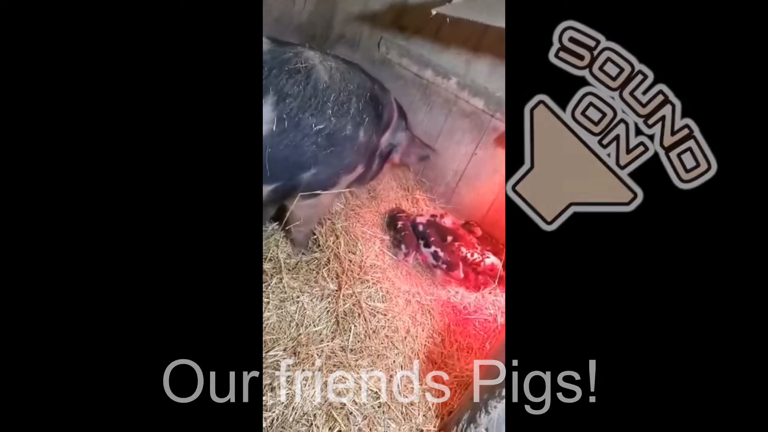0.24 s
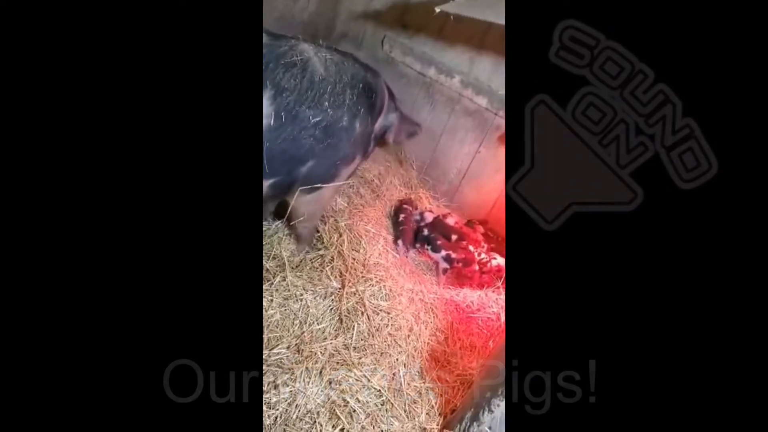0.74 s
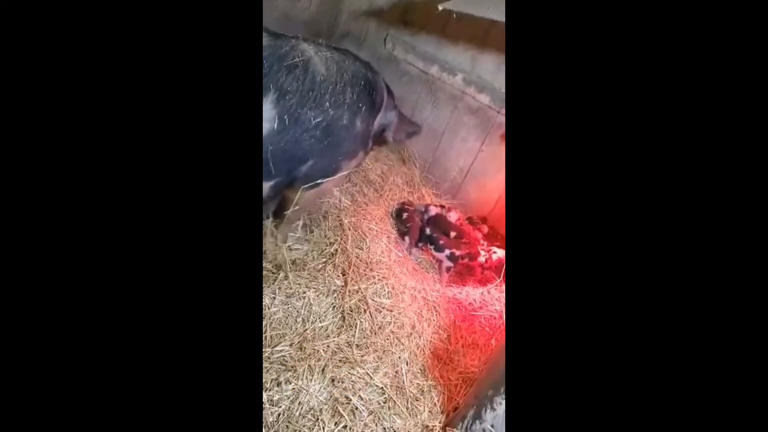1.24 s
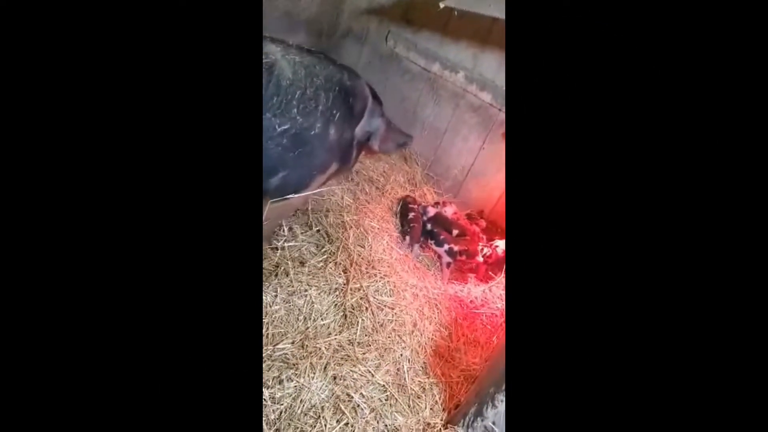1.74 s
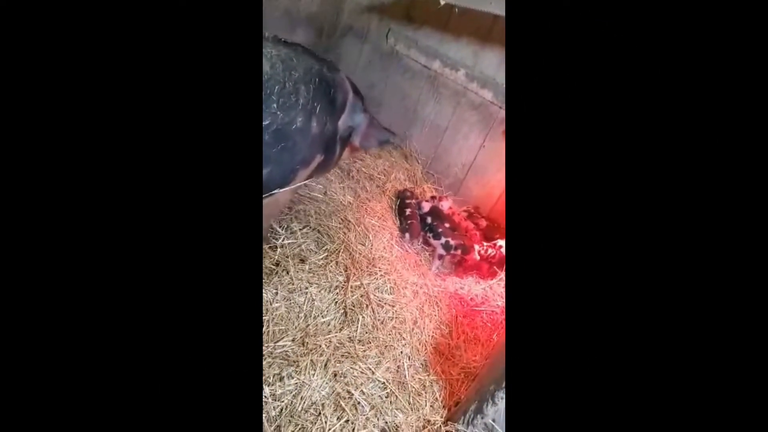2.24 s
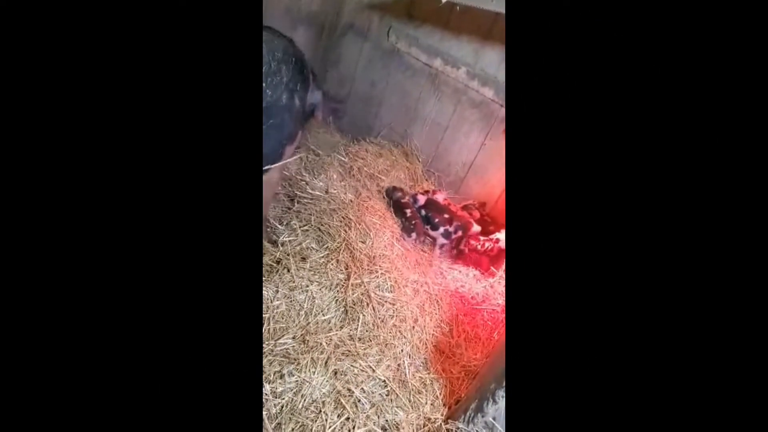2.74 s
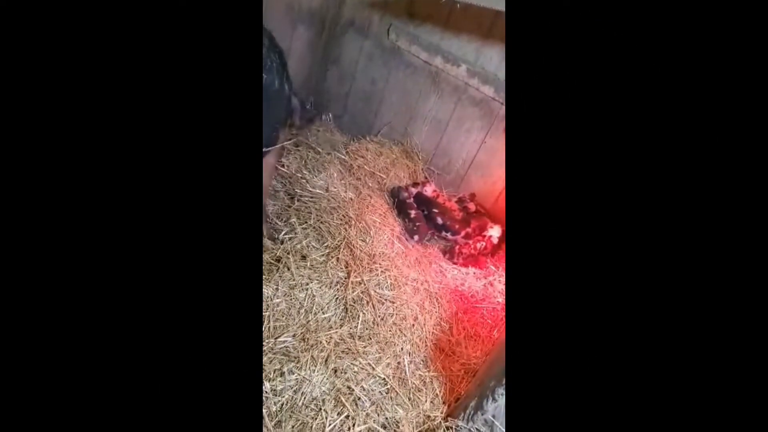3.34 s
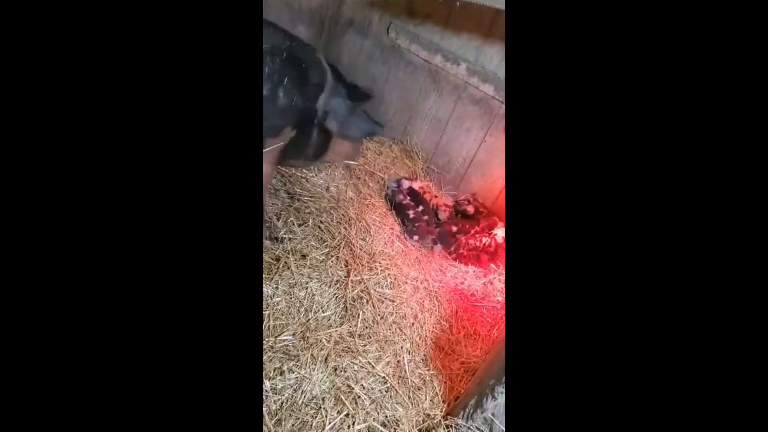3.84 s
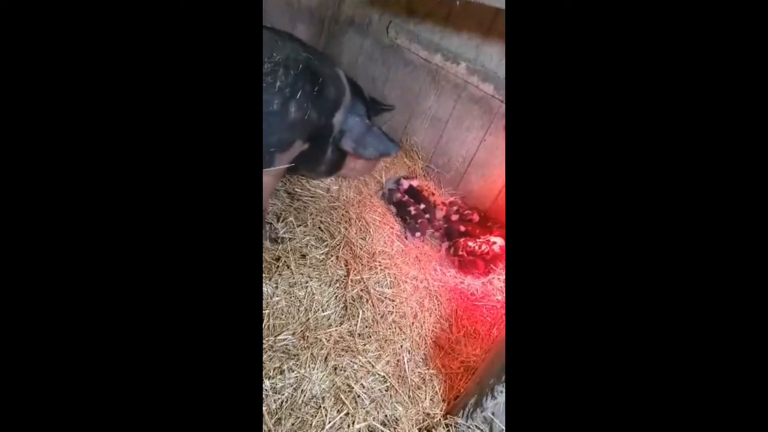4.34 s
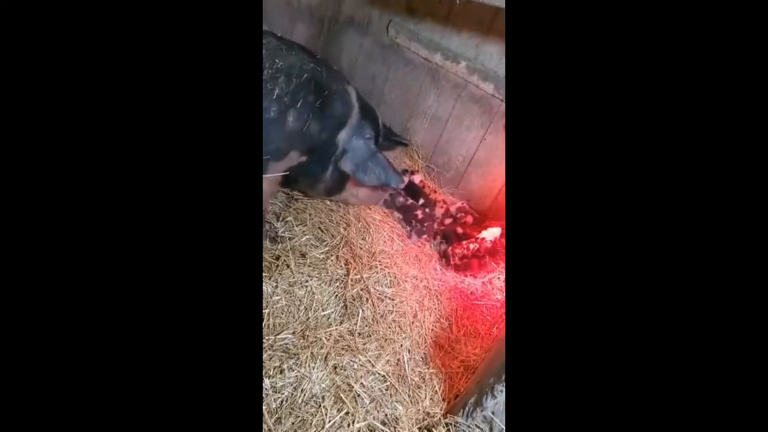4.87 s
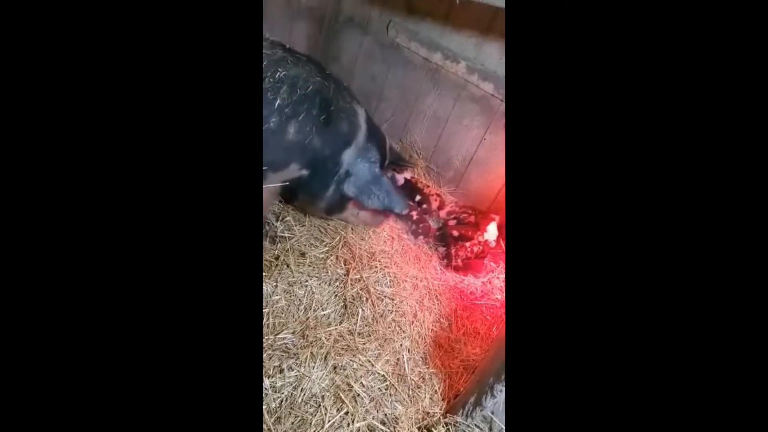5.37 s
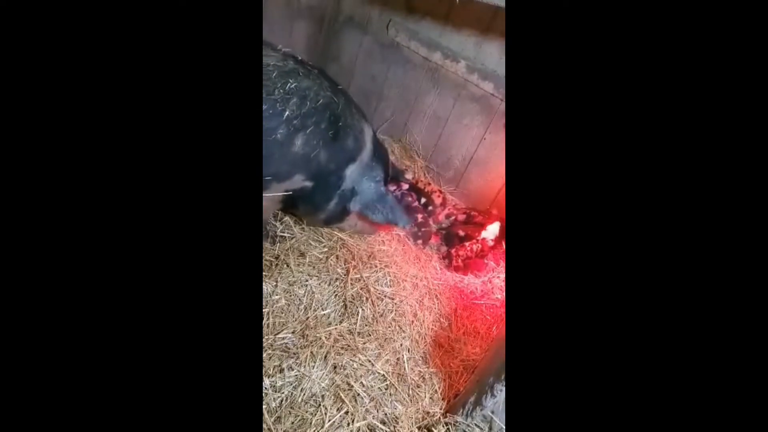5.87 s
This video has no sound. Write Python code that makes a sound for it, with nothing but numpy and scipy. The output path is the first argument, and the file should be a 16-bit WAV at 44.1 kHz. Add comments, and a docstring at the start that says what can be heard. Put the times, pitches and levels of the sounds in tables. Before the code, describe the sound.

A large sow roots right beside the microphone in a straw-bedded wooden pen. Short, deep, croaky grunts come several times a second, mixed with breathy sniffs and rough snorts, some whistling faintly. A deep bass flutter throbs underneath. Just past the middle, a piglet gives one very short, hoarse squeal. Then the grunting and snuffling carry on to the end, over low barn rumble.

```python
"""A sow roots and grunts in a straw-bedded wooden pen, close to a phone with two microphone ports.
Her grunts are a few slow throat pops ringing in chest, nose and mouth; shaped noise, roughened by random
fine clicks, makes her sniffs and snorts, and short tones whistle, hum and thump among them.
A deep flutter of low sines and rumble throbs under her breaths; a piglet squeals once in hoarse partials.
Low coloured noise is the barn; a high band of noise is partly steady and partly follows the breath level."""
import sys
import numpy as np
from scipy import signal
from scipy.fft import rfft, irfft, next_fast_len
from scipy.io import wavfile
from scipy.ndimage import uniform_filter1d, map_coordinates

SR = 44100
rng = np.random.default_rng(int(sys.argv[2]) if len(sys.argv) > 2 else 0)


def to_wav(s):
    """Save 16-bit WAV."""
    ch = np.atleast_2d(s).T  # columns
    pcm = np.round(np.clip(ch, -1, 1) * 32767)  # PCM
    wavfile.write(sys.argv[1], SR, pcm.astype(np.int16))


N = 269451

# the sow's breaths: (strongest at [s], airflow [dB], rise [s], fall [s],
#                     whistle over airflow [dB], low mouth ring over airflow [dB])
BREATH_TABLE = [(.084, -46, 0.04, 0.31, -15, 3.5), (.255, -45, 0.013, 0.087, -20, 12.5),
                (.43, -34, 0.077, 0.27, -6, -0.5), (.53, -47, 0.14, 0.039, -15, 3),
                (0.637, -34.5, 0.0095, 0.15, -18, -2.5), (.7, -43, 0.098, 0.099, -5, 11.5),
                (.88, -50, 0.067, 0.031, -12, 11), (0.963, -39.5, 0.0088, 0.26, 7.5, 5.5),
                (1.166, -47, 0.13, 0.077, 3, -9), (1.284, -46, 0.12, 0.2, 9.5, 9),
                (1.38, -44, 0.075, 0.11, -26, 2), (1.55, -47.5, 0.48, 0.43, 2, -17),
                (1.69, -38, 0.081, 0.21, -5, -2), (1.79, -33.5, 0.26, 0.051, -18, -5.5),
                (1.938, -36, 0.11, 0.075, -24, -22), (2.045, -37, 0.11, 0.15, 8, 5),
                (2.152, -33.5, .07, 0.22, -13, -5), (2.399, -36.5, 0.11, 0.22, 7, 6),
                (2.527, -37, 0.028, 0.18, -0.5, -8), (2.762, -33, 0.11, 0.2, 4, 5.5),
                (2.951, -37, 0.34, 0.16, -1, 0), (3.068, -36, 0.099, 0.14, -11, 1),
                (3.291, -37, 0.075, 0.33, 6, 5), (3.543, -35, 0.15, 0.11, 2, -3),
                (3.776, -38, 0.088, 0.19, 5.5, 3.5), (3.939, -46, 0.13, 0.19, 2.5, -9),
                (4.123, -42, 0.034, 0.12, 5.5, 10), (4.27, -48.5, 0.011, 0.083, -18, 19.5),
                (4.43, -53, 0.0094, 0.076, -20, 27), (4.55, -35.5, 0.042, 0.4, -4.5, -1.5),
                (4.631, -32.5, 0.12, 0.086, -9, -5.5), (4.725, -62, 0.045, 0.022, -1, 14),
                (4.799, -31.5, 0.028, 0.17, -10.5, -14), (4.909, -39, 0.068, 0.1, -21, 1),
                (4.999, -41.5, 0.02, 0.051, -1, 13), (5.039, -52.5, 0.018, 0.053, -4, 25.5),
                (5.143, -35, 0.083, 0.25, -3, 3), (5.35, -41, 0.012, 0.056, -17, 15),
                (5.501, -32.5, 0.054, 0.24, -4, -24), (5.59, -32, 0.15, 0.08, -23, -3.5),
                (5.754, -32, 0.038, 0.11, -16, -6.5), (5.878, -39.5, 0.06, 0.26, 9.5, 7),
                (5.97, -36, 0.099, 0.07, -15, -1)]
# throbs of the deep flutter: (strongest at [s], level [dB], rise [s], fall [s], middle pitch [Hz])
THROB_TABLE = [(.08, -30.5, 0.084, 0.19, 52.7), (.31, -28.5, 0.18, 0.092, 56.44),
               (.43, -28, 0.054, 0.069, 60.7), (.49, -17.5, 0.013, 0.066, 61.9),
               (.66, -17.5, 0.031, 0.088, 61.6), (.78, -29, 0.15, 0.069, 55.4),
               (.88, -34, 0.055, 0.31, 54.2), (1.22, -26.5, 0.18, 0.039, 54.9),
               (1.31, -41, 0.016, 0.12, 60.4), (1.4, -35.5, 0.26, 0.045, 56.3),
               (1.57, -32, 0.2, 0.083, 51.7), (1.68, -38, 0.058, 0.13, 53.6),
               (1.79, -22.5, 0.12, 0.084, 55.7), (1.92, -25.5, 0.035, 0.086, 55.8),
               (2.021, -25, 0.06, 0.1, 56.1), (2.19, -24.5, 0.11, 0.078, 56.7),
               (2.35, -30, 0.12, 0.03, 57.6), (2.53, -28, 0.11, 0.082, 56.8),
               (2.69, -27, 0.083, 0.069, 54.9), (2.9, -27.5, 0.14, 0.05, 50.6),
               (3.1, -25, 0.13, 0.069, 49.8), (3.23, -31, 0.22, 0.049, 53.4),
               (3.38, -35, 0.063, 0.053, 49.3), (3.61, -31.5, 0.15, 0.028, 54.3),
               (3.81, -27, 0.082, 0.05, 55.1), (3.95, -30, 0.087, 0.064, 56),
               (4.139, -29.5, 0.073, 0.038, 52.2), (4.25, -28, 0.023, 0.087, 55),
               (4.439, -31, 0.071, 0.065, 57.2), (4.621, -25.5, 0.16, 0.18, 62.1),
               (4.801, -22.5, 0.017, 0.12, 60.94), (4.921, -22.5, 0.053, 0.099, 54.35),
               (5.05, -31, 0.12, 0.035, 56.8), (5.24, -31.5, 0.086, 0.028, 57.7),
               (5.36, -25.5, 0.037, 0.062, 54.35), (5.55, -25, 0.093, 0.18, 61.26),
               (5.77, -23.5, 0.036, 0.079, 59), (5.899, -41, 0.037, 0.051, 54.8),
               (6.1, -31, 0.25, 0.14, 51.7)]
BREATH_ROUND, THROB_ROUND = 1.09, 1.11  # 1 = pointed swell, 2 = rounded


def amp(db):
    """Amplitude of a level in dB."""
    return 10 ** (np.asarray(db) / 20)


def unit(x):
    """x scaled to an rms of 1."""
    return x / np.sqrt(np.mean(x ** 2) + 1e-20)


def along(points, hz):
    """Reads (frequency [Hz], value) points on a log frequency axis."""
    f, v = np.transpose(points)
    return np.interp(np.log(hz + 1), np.log(f + 1), v)


def curves(rows):
    """One value per sample for each column after the time."""
    s, *cols = np.transpose(rows)
    return [np.interp(np.arange(N) / SR, s, c) for c in cols]


def wobble(rate):
    """A smooth random curve, rate knots a second."""
    knots = rng.standard_normal(int(N * rate / SR) + 4)
    return map_coordinates(knots, [np.arange(N) * rate / SR])


def swells(s, db, rise, fall, round_top):
    """The joint amplitude of swells that lose 20 dB in their rise and fall times."""
    grid = np.arange(0, N / SR + .002, .002)
    late = grid[:, None] - s
    drop_db = 20 * np.abs(late / np.where(late < 0, rise, fall)) ** round_top
    joint = np.linalg.norm(amp(db - drop_db), axis=1)
    return np.interp(np.arange(N) / SR, grid, joint)


def filtered(x, response):
    """x filtered by a complex response of frequency."""
    m = next_fast_len(N + SR // 2)
    return irfft(rfft(x, m) * response(np.fft.rfftfreq(m, 1 / SR)), m)[..., :N]


def modes(table):
    """Causal response of (centre [Hz], width [Hz], peak [dB]) resonances, alternating in sign."""
    def response(f):
        total = 0
        for k, (centre, width, db) in enumerate(table):
            damping = 1j * f * width
            total = total + (-1) ** k * amp(db) * damping / (centre * centre - f * f + damping)
        return total
    return response


def air(response, patchy_db):
    """Two unrelated noises, of joint rms 1, that share a colour and patches of random gain."""
    z = signal.stft(rng.standard_normal((2, N)), nperseg=512)[2]
    field = uniform_filter1d(rng.standard_normal(z.shape[1:]), size=2, axis=0)
    field = uniform_filter1d(field, size=8, axis=1)
    patchy = signal.istft(z * amp(patchy_db * unit(field)), nperseg=512)[1][:, :N]
    return unit(filtered(patchy, response))


def at_ports(pair):
    """Mixes two unrelated signals into a left and right that are as alike as the ports hear them."""
    # likeness of the two microphone ports: (frequency [Hz], correlation [0 to 1])
    likeness = [(60, 1), (130, 0.99), (280, 0.95), (500, 0.4), (620, 0.68), (800, 0.3), (1350, 0.4),
                (1900, 0.29), (3000, 0.29), (5000, 0.028), (7000, 0.038)]

    def mix(hz):
        turn = np.arccos(np.clip(along(likeness, hz), 0, 1)) / 2
        return np.array([np.cos(turn), np.sin(turn)])
    mid, side = filtered(pair, mix)
    return np.array([mid + side, mid - side])


def high_band():
    """Noise mostly above 8 kHz, unrelated between the ports: a steadier part and one following the breaths."""
    # steadier part: (time [s], level [dB])
    steady_level = [(0, -45), (.75, -45), (1.25, -39), (1.75, -37.5), (2.55, -37.5), (3.1, -46), (4.2, -41),
                    (4.4, -46), (5.2, -42), (5.45, -47.5), (6.11, -41.5)]
    # colour of the band: (frequency [Hz], relative level per Hz [dB])
    band_colour = [(7500, -21), (8600, 7.5), (9600, 15), (11000, 11.5), (12600, 8.5), (13300, -31)]
    s, flow_db, rise, fall = np.transpose(BREATH_TABLE)[:4]
    following = swells(s, flow_db - 7, rise, fall, BREATH_ROUND)  # 7 dB under the airflow
    level = np.hypot(amp(curves(steady_level)[0]), following)
    return level * air(lambda f: amp(along(band_colour, f)), patchy_db=3.3)


def barn():
    """The background of the barn: coloured noise that drifts slowly and rises with the throbs."""
    # colour of the barn: (frequency [Hz], relative level per Hz [dB])
    barn_colour = [(20, -10), (50, 2.5), (110, -6.5), (200, -2), (310, -7), (450, -8), (720, -17),
                   (1290, -15.5), (2300, -33), (3080, -36.5), (5800, -26.5), (7000, -39.5)]
    # level before drift and rise: (time [s], level [dB])
    barn_level = [(0, -37), (1.0, -36.5), (2.2, -35.5), (3.0, -37), (3.8, -34.5), (4.7, -35.5),
                  (6.11, -35.5)]
    swell_db, wander_db = 6, 1.3  # most the throbs lift it, slow random drift
    throbs = swells(*np.transpose(THROB_TABLE)[:4], THROB_ROUND)
    lift_db = swell_db * np.tanh(throbs / amp(-31))
    level_db = curves(barn_level)[0] + wander_db * wobble(4.14) + lift_db
    return amp(level_db) * at_ports(air(lambda f: amp(along(barn_colour, f)), patchy_db=2.5))


def pen(x):
    """The plank walls answer with a noise tail; each frequency dies at its own speed."""
    # echo of the pen: (frequency [Hz], time to fall 60 dB [s])
    decay = [(150, .2), (270, .12), (1000, .17), (5000, .1)]
    hz, t, z = signal.stft(rng.standard_normal((2, SR // 2)), SR, nperseg=256)
    dying = z * amp(-60 * t / along(decay, hz)[:, None])
    tail = signal.istft(dying, SR, nperseg=256)[1]
    tail = tail / np.linalg.norm(tail[0])
    delayed = np.pad(x, (300, 0))  # samples before the walls answer
    return at_ports(signal.fftconvolve(delayed[None], tail, axes=1)[:, :N])


def squeal():
    """A piglet's hoarse squeal: four partials on one jittering pitch that dips and climbs back."""
    # path of the squeal: (time [s], middle pitch [Hz], level [dB])
    path = [(3.424, 1330, -60), (3.442, 1390, -35.5), (3.46, 1385, -35.5), (3.47, 1257, -39),
            (3.487, 1137, -40), (3.5, 1250, -47), (3.513, 1440, -34), (3.53, 1410, -44),
            (3.554, 1413, -32.5), (3.575, 1340, -61)]
    # its first four partials: (relative level [dB])
    partials_db = [-3.5, -13, 2.5, -1]
    jitter, clear = .013, 1.2  # relative pitch jitter, steady tone against its noisy flutter

    hz, db = curves(path)
    first, last = path[0][0], path[-1][0]
    sounding = np.abs(np.arange(N) / SR - (first + last) / 2) < (last - first) / 2
    phase = 2 * np.pi * np.cumsum(hz * (1 + jitter * wobble(400))) / SR
    pair = np.zeros((2, N))
    for voice, turn in zip(pair, (0, np.pi / 2)):
        for k, level in enumerate(partials_db, 1):
            hoarse = clear + wobble(700)
            voice += amp(level) * hoarse * np.sin(k * phase + turn)
    return at_ports(sounding * amp(db) * pair)


def flutter():
    """A deep, unsteady throb with its overtones and a rumble, nearly the same on both ports."""
    # colour of the rumble: (frequency [Hz], relative level per Hz [dB])
    rumble_colour = [(20, -19), (40, -3.5), (60, 13.5), (95, 0), (150, -17), (300, -29), (600, -32)]
    s, db, rise, fall, pitch = np.transpose(THROB_TABLE)
    hz = np.interp(np.arange(N) / SR, s, pitch)
    phase = 2 * np.pi * np.cumsum(hz * (1 + 0.0692 * wobble(25))) / SR
    throb = np.sin(phase) + amp(-32.0) * np.sin(2 * phase) + amp(-16.0) * np.sin(3 * phase)
    throb = throb * amp(0.41 * wobble(35))
    rumble = air(lambda f: amp(along(rumble_colour, f)), patchy_db=2.5)
    side = amp(-27) * rumble[1] * [[1], [-1]]  # faint difference between left and right
    return swells(s, db, rise, fall, THROB_ROUND) * (throb + amp(-2.5) * rumble[0] + side)


def short_tones():
    """Unsteady sine bursts: whistles in the breath, low hums, a thump and a grunt's ringing tail."""
    # short tones: (middle [s], half length [s], middle pitch [Hz], level before the flutter [dB])
    tones = [(0.692, 0.019, 2400, -33), (0.694, 0.031, 5250, -35.5), (0.992, 0.021, 2320, -38),
             (0.986, 0.043, 2610, -39), (0.992, 0.026, 5310, -30.5), (2.398, 0.023, 5490, -37),
             (2.409, 0.021, 5490, -30.5), (2.767, 0.045, 2360, -30.5), (2.77, 0.019, 5510, -32),
             (2.772, 0.046, 5510, -31), (3.29, 0.039, 2590, -35.5), (3.293, 0.024, 5590, -30),
             (3.138, 0.026, 238, -25.5), (4.912, 0.017, 4066, -38), (5.902, 0.032, 2640, -33.5),
             (3.309, 0.015, 1345, -38), (3.414, 0.058, 85.8, -37), (3.541, 0.022, 1606, -25),
             (4.308, 0.026, 622, -31), (5.872, 0.073, 1281, -34), (6.001, 0.027, 136, -24.5)]
    waver = .016  # relative pitch spread
    out = np.zeros((2, N))
    drift = np.cumsum(1 + waver * np.array([wobble(90), wobble(110)]), axis=1) / SR
    hoarse = amp(4.5 * np.array([wobble(300), wobble(300)]))
    for s, half, hz, db in tones:
        at = np.arange(round((s - 2 * half) * SR), round((s + 2 * half) * SR))
        u = (at / SR - s) / half
        tone = np.sin(2 * np.pi * hz * drift[:, at])
        out[:, at] += amp(db) * np.exp(-u ** 4) * hoarse[:, at] * tone
    return at_ports(out)


def sniffs():
    """Snout noise roughened by fine clicks; some sniffs ring low in the mouth and whistle, others only rush."""
    # snout resonances: (centre [Hz], width [Hz], relative peak [dB])
    snout = [(3500, 600, 5), (4260, 700, 6), (5120, 600, 6.5), (6200, 500, 5)]
    # mouth resonances: (centre [Hz], width [Hz], relative peak [dB])
    mouth_modes = [(1324, 313, -2), (2216, 1010, -0.5), (2446, 643, 1.5)]
    # whistle resonances, the response is squared: (centre [Hz], width before squaring [Hz],
    #                                               relative peak before squaring [dB])
    whistle_modes = [(2420, 510, 8), (5505, 420, 8.5), (6050, 700, 7.5)]
    # colour of the fine clicks: (frequency [Hz], relative level per Hz [dB])
    click_colour = [(1500, -6), (2600, -2), (4500, -4.5), (6500, -4), (9000, -13)]
    whistle_span = 0.46  # share of a breath, around its peak, in which it whistles
    clicks_per_s, clicks_db, spread_db = 400, -10, 5  # fine clicks; their level is over the airflow

    s, flow_db, rise, fall, whistle_db, mouth_db = np.transpose(BREATH_TABLE)

    def flow(db, span=1):
        """Airflow of all breaths, db over its tabled level."""
        return swells(s, flow_db + db, span * rise, span * fall, BREATH_ROUND)

    rush = flow(-1.5) * air(modes(snout), patchy_db=4.2)
    mouth = flow(mouth_db) * air(modes(mouth_modes), patchy_db=3.5)
    whistle = air(lambda hz: modes(whistle_modes)(hz) ** 2, patchy_db=0)
    whistle = flow(whistle_db, whistle_span) * whistle
    ruffle = amp(1.3 * wobble(40) + 1.5 * wobble(400))

    clicking = rng.random((2, N)) < clicks_per_s / SR
    strength = amp(spread_db * rng.exponential(size=(2, N)).clip(0, 3))
    clicks = clicking * strength * rng.choice([-1, 1], (2, N))
    grain = unit(filtered(clicks, lambda hz: amp(along(click_colour, hz))))
    return at_ports(flow(clicks_db) * grain + ruffle * (rush + mouth + whistle))


def grunts():
    """Vocal-fold pops ring the throat, puff through it and thump the chest; weaker pops fall halfway."""
    # grunts: (start [s], first pop [dB], second pop over first [dB], nose ring [Hz], nose ring over pop [dB],
    #          mouth ring [Hz], mouth ring over pop [dB], brightness over pop [dB], chest [dB],
    #          upper chest ring over lower [dB], chest swell a pop [dB],
    #          halfway pop in the chest [dB], halfway pop in the throat [dB])
    calls = [(0.076, -18.5, -9, 588, -9, 945, -14, -13, -13, 6, -9, -11, 0),
             (.247, -13.5, -8, 613, -8, 950, -38, -19, -12, 3, -11, -1, -19),
             (0.412, -29.5, -2.5, 582, -2.5, 910, -10, -23, -50, -3, 9, -3, -9),
             (.537, -18.5, -12, 567, -14, 950, -8, -30, -18.5, -6, 0, -10, -16),
             (.635, -19.5, -4, 582, -15.5, 918, -29, -32, -32.5, 14, 10, -4, -7),
             (.762, -18.5, -11, 595, -13.5, 970, -13, -11, -23, -16, 4, -5, -3),
             (.843, -20.5, 3, 550, -17, 915, -6, -5, -21, -35, 7.5, -10, -4),
             (1.091, -29.5, -1, 560, -7, 945, -17, -9, -22.5, -6, -5, -6, -2),
             (1.148, -13, -4.5, 550, -14.5, 935, -6, -7, -11.5, -0.5, 0, -5.5, -4.5),
             (1.337, -17.5, 3, 571, -9.5, 957, -13.5, -12, -16.5, -7, 5.5, -10, -7),
             (1.513, -15.5, -12, 597, -8, 946, -10, -2, -19, -1, -7.5, 0, -5),
             (1.75, -27.5, 6.5, 598, -19, 940, -15, -0.5, -25, -8.5, 10, -5, -2),
             (1.899, -25.5, 0, 580, -8.5, 938, -14, 1, -51, -7, -4, -6, -12),
             (2.026, -16.5, -25, 604, -12, 959, -15, -12, -17, 0, -1, -14, -10),
             (2.189, -21.5, -14, 600, -22, 908, -9, -10, -19.5, -3, -18.5, 10, 6),
             (2.328, -17.5, -12, 617, -13, 945, -12, -15, -24, 12, 2.5, 2, -3),
             (2.486, -16, 1.3, 542, -17, 946, -6, -2.5, -16, 7.5, 4, -5, -5.5),
             (2.676, -14, -21, 603, -16.5, 934, -3, -3.5, -15, 2.5, -11.5, 5.5, 0.5),
             (2.848, -15, 2, 569, -15, 958, -5, -3, -15.5, -3, 1.5, -11, -18),
             (3.06, -30.5, 9.5, 574, -17, 954, -12, -11, -35, -8, 13.5, 3.5, -3),
             (3.167, -17.5, 3, 559, -21, 932, -12, 0, -16.5, -34, 7, -4.5, -4),
             (3.511, -29.5, 11, 508, -9.5, 908, -5.5, -0.5, -17.5, -22, 11, -6.5, -1),
             (3.744, -26.5, -9, 562, -5, 964, -9, -8, -14.5, 7, -5, -9, -4),
             (3.766, -12, -13, 580, -13.5, 989, -6, -1.5, -7, 2, 2, -9, -19),
             (3.919, -21.5, -30, 617, -4.5, 930, -28, -10, -28, -1, -1.5, -3, -12),
             (3.937, -15, -8, 596, -8.5, 942, -10, -13, -33, -11, 3, -7, -21),
             (4.082, -29, -11, 584, -25, 936, -10, 1, -32, 4, .6, 7, -10),
             (4.118, -12.5, -13, 594, -24.5, 956, -0.5, -2, -11, 10.5, -12, -5, -5),
             (4.269, -21, -12, 633, -11.5, 990, 2.3, -0.5, -14, 17, -9, -0.5, -19),
             (4.427, -18, -11.5, 606, -12, 967, 1, 2, -16.5, 33, -0.5, -4.5, -19),
             (4.694, -25.5, -19, 599, -10, 924, -6.5, -3, -20, -19, -23, 2, -3),
             (4.785, -46, 17.5, 558, -11, 973, -3, 3, -30, 19, 9.5, 3, 8.5),
             (4.96, -32, -12, 580, -5, 930, 3, -21, -21, -13, 3, -7, -16),
             (4.997, -24, -1.5, 569, 0.5, 935, 3.5, -2, -13, -7, 6, -10, -35),
             (5.183, -15, 1, 573, -10, 902, -8, -2, -12, 24, 5.5, -3.5, -4),
             (5.343, -15.5, -11.5, 566, -7, 972, -4.5, 1.5, -12, 22, -1.5, 1, -1.5),
             (5.489, -32.5, 3, 546, 3.5, 973, -19, -20, -34.5, 3, 10, 10.5, 0),
             (5.629, -20.5, -7, 540, -25, 939, -7, -3.5, -17, -23, -6, -11, -14),
             (5.747, -33, -6, 550, -7, 956, -3, -10.5, -24.5, -5, 11.5, 4, 2),
             (5.821, -30, -13, 558, -10, 952, -3, -4, -13.5, 12, -1, -0.5, -12),
             (5.982, -19, -1, 597, -7, 944, -11.5, -10, -16.5, -12, 0, 6, -31),
             (6.091, -31.5, -17, 541, -5, 908, 0, -0.5, -14, 18, 4.5, -6, -12)]
    # throat resonances of a puff: (centre [Hz], width [Hz], peak [dB])
    throat_modes = [(410, 89, 5.5), (840, 180, 1.5), (1080, 260, 1.5)]
    # bright resonances of a puff: (centre [Hz], width [Hz], peak [dB])
    bite_modes = [(2110, 220, -6.5), (2830, 530, -8.5), (3320, 400, -11)]
    # throat rings: (middle pitch [Hz], time to fall 60 dB [s])
    throat_rings = [(1280, .06), (1640, .055), (1920, .045)]
    # rise of the nose, mouth and three throat rings: (time constant [s])
    ring_attack = [.0015, .005, .002, .003, .002]
    # the two top throat rings: (level over the brightness [dB])
    bright_rings_db = [-11, -13.5]
    # lower chest ring: (time [s], middle pitch [Hz])
    low_chest = [(0, 175), (1.3, 176.7), (2.05, 165), (2.17, 207), (2.6, 198), (3.15, 227.2), (3.5, 215.2),
                 (4.3, 215.4), (4.7, 230), (5.5, 205), (6.11, 239.6)]
    # upper chest ring: (time [s], middle pitch [Hz])
    high_chest = [(0.0, 254), (0.73, 250.5), (0.94, 245), (1.0, 252), (1.97, 251.7), (2.04, 254.2),
                  (3.62, 249.4), (4.37, 260.6), (4.99, 253.7), (5.41, 258.8), (5.67, 252.3), (6.11, 255.5)]
    # lower and upper chest ring: (time to fall 60 dB [s])
    chest_t60 = [.04, .04]
    nose_t60, mouth_t60, puff_t60 = 0.055, .044, .04  # s to fall 60 dB
    hold, ring_hold = 1.5, 2.4  # power of time: a ring holds longer than a puff, then stops
    attack, chest_rise = .002, 0.0053  # s
    pop_gap, lead = .036, 0.003004  # s between strong pops; s a pop starts before it is heard
    opening, opening_s = .1, .006  # rings start this share flat and rise as the mouth opens
    detune, rasp_depth = .017, .35  # pitch spread from pop to pop, throb of a ring
    puff_db, snap_db = 2.5, 8.5  # ragged puff over the pop; snap as the folds part
    third_ring_db = -13.5  # lowest throat ring over the pop
    chest_peak_db, chest_fade_db = 5.5, 4  # thump peak over mean; breath runs out, with pop number squared

    puffs = np.zeros((2, 2, N + SR))  # (throat or bright, port, sample)
    throat, chest = np.zeros((2, N + SR)), np.zeros(N + SR)
    t = np.arange(SR // 15) / SR
    rest_hz, rest_t60 = np.transpose(throat_rings)
    ring_t60 = np.append([nose_t60, mouth_t60], rest_t60)[:, None, None]
    quarter = np.array([[0], [-np.pi / 2]])  # keeps a ring equally strong on both ports

    ring_rise = 1 - np.exp(-t / np.reshape(ring_attack, (5, 1, 1)))
    ring_shape = amp(-60 * (t / ring_t60) ** ring_hold) * ring_rise
    puff_shape = amp(-60 * (t / puff_t60) ** hold) * (1 - np.exp(-t / attack))
    thump_rise = 1 - np.exp(-(t / chest_rise) ** 2)
    thump_shape = amp(-60 * (t / np.reshape(chest_t60, (2, 1))) ** hold) * thump_rise
    snap_at = round(attack * SR)
    puff_shape[snap_at] *= amp(snap_db)
    glide = t + opening * opening_s * np.exp(-t / opening_s)

    ends = [row[0] for row in calls[1:]] + [N / SR]
    for call, end in zip(calls, ends):
        s, db, second_db, nose_hz, nose_db, mouth_hz, mouth_db, bite_db = call[:8]
        chest_db, upper_db, swell_db, weak_chest_db, weak_db = call[8:]
        rings_db = [nose_db, mouth_db, third_ring_db, *np.add(bite_db, bright_rings_db)]
        rings_hz = np.append([nose_hz, mouth_hz], rest_hz)[:, None, None]
        chest_hz = np.array([[np.interp(s, *np.transpose(path))] for path in (low_chest, high_chest)])
        chest_hz = chest_hz * (1 + detune * rng.standard_normal((2, 1)))
        upper_share = 1 / (1 + amp(-upper_db))
        for half in range(8):
            k, weak = half / 2, half % 2  # pop number; 1 for a halfway pop
            start = s + k * pop_gap - lead
            if start > end - .012:  # the next grunt is due
                continue
            at = slice(round(start * SR), round(start * SR) + len(t))
            noise = rng.standard_normal((2, 2, len(t)))
            noise[..., snap_at] = 2.5  # the snap itself
            scatter = rng.standard_normal((3, 5, 2, 1))

            closing_db = -9 * max(k - 1, 0)  # after the second pop the mouth closes
            pop_db = db + min(k, 1) * second_db + closing_db + weak * weak_db
            puff_levels = amp(pop_db + np.array([puff_db, bite_db + 10.0]))[:, None, None]
            puffs[..., at] += puff_levels * noise * puff_shape

            pitch = rings_hz * (1 + detune * scatter[0, :, :1])
            # the wet throat never rings evenly
            rasp_hz = 70 * (1 + 0.16 * scatter[2, :, 1:])
            rasp = 1 + rasp_depth * np.cos(2 * np.pi * rasp_hz * t + 3 * scatter[1, :, 1:])
            turn = 3 * scatter[1, :, :1] + quarter * np.sign(scatter[2, :, :1])
            rings = np.sin(2 * np.pi * pitch * glide + turn) * rasp * ring_shape
            throat[:, at] += (amp(pop_db + np.reshape(rings_db, (5, 1, 1))) * rings).sum(axis=0)

            # each pop jolts the chest ring partly out of step
            thump_hz = chest_hz * (1 + .5 * detune * scatter[1, :2, 1])
            thump_phase = 2 * np.pi * thump_hz * (t + k * pop_gap) + scatter[0, 0, 1]
            lower, upper = np.sin(thump_phase) * thump_shape
            level_db = chest_db + swell_db * k - chest_fade_db * k * k + weak * weak_chest_db
            thump = (1 - upper_share) * lower + upper_share * upper
            chest[at] += amp(level_db + chest_peak_db) * thump
    throat_puffs = filtered(puffs[0, :, :N], modes(throat_modes))
    bright_puffs = filtered(puffs[1, :, :N], modes(bite_modes))
    return at_ports(throat[:, :N] + throat_puffs + bright_puffs) + chest[:N]


def scene():
    """The sow close by, the pen answering her grunts, the piglet and the background."""
    voice = grunts()
    answer = amp(-6.5) * pen(voice.mean(axis=0))
    background = high_band() + barn()
    return background + answer + squeal() + flutter() + short_tones() + sniffs() + voice


def record(dry):
    """The two ports differ in arrival time and colour; in the bass they match."""
    # balance of the ports: (frequency [Hz], left over right before the bass is evened out [dB])
    balance = [(300, -2.5), (700, -1.5), (1400, -6.5), (2300, -2), (3800, 0.5), (6100, 2.5), (7000, 0.5),
               (8800, -2.5), (10700, 7), (12500, 1.5)]
    # overall colour, a narrow gap near 8 kHz: (frequency [Hz], gain [dB])
    colour = [(6500, -1), (7000, -1.5), (7500, -14.5), (8100, -17), (8600, -5), (9000, -6)]
    lag, lag_from_hz = 24, 1183  # samples by which left leads; below this pitch the ports move together
    bass_hz, top_hz = 250, 13300  # the balance evens out below the first; nothing passes above the second

    def ports(hz):
        early = 2 * np.pi * hz * lag / SR / (1 + (lag_from_hz / (hz + 1)) ** 20)
        tilt = along(balance, hz) / 2 / (1 + (bass_hz / (hz + 1)) ** 2)
        gain = amp(along(colour, hz) + np.array([tilt, -tilt])) * (hz < top_hz)
        return gain * np.exp(.5j * np.array([early, -early]))
    return filtered(dry, ports)


dry = scene()
out = record(dry)
to_wav(out)
```